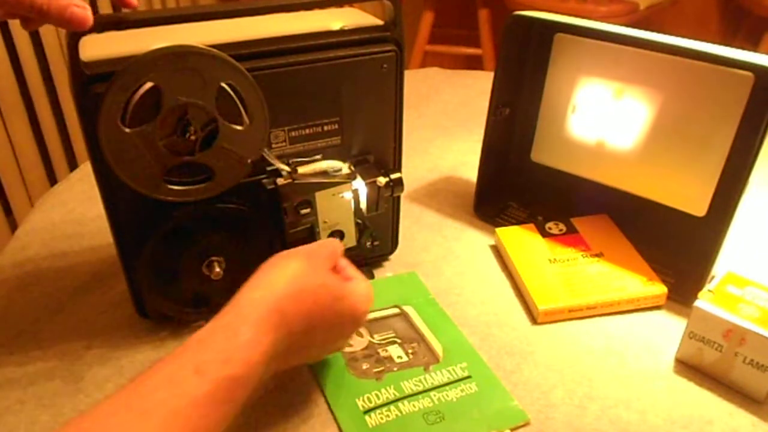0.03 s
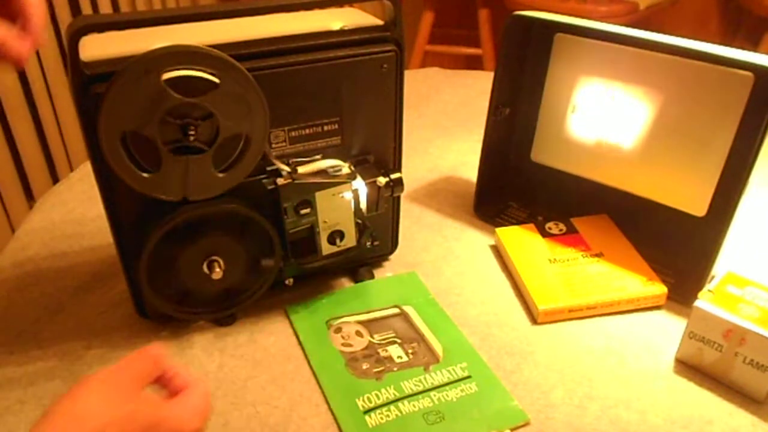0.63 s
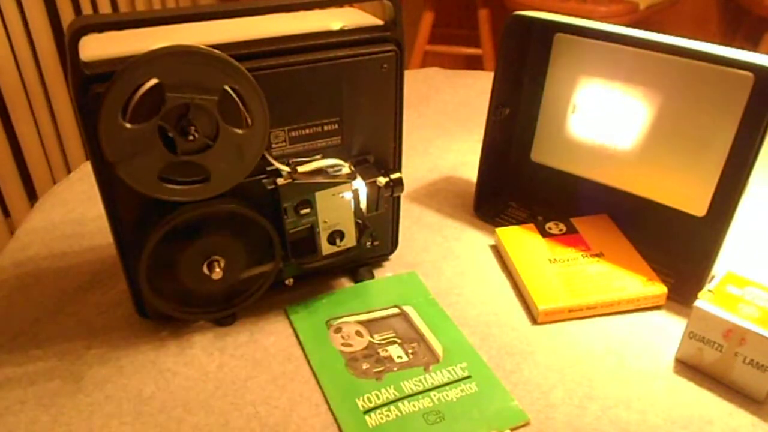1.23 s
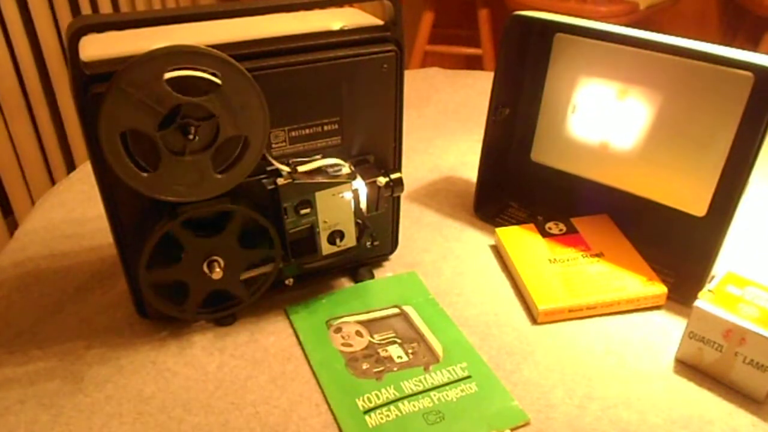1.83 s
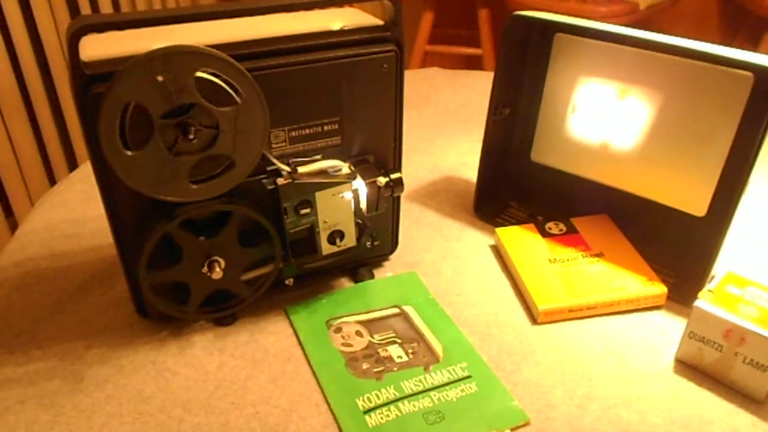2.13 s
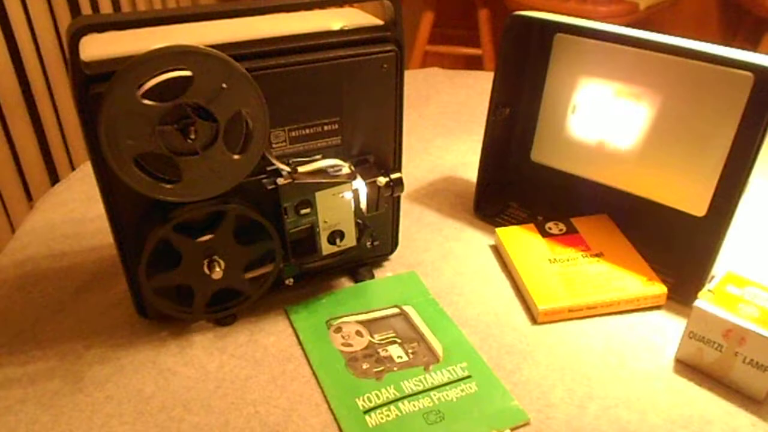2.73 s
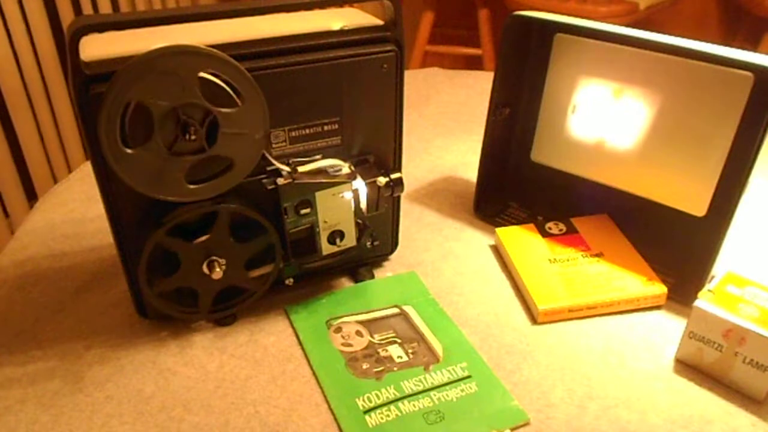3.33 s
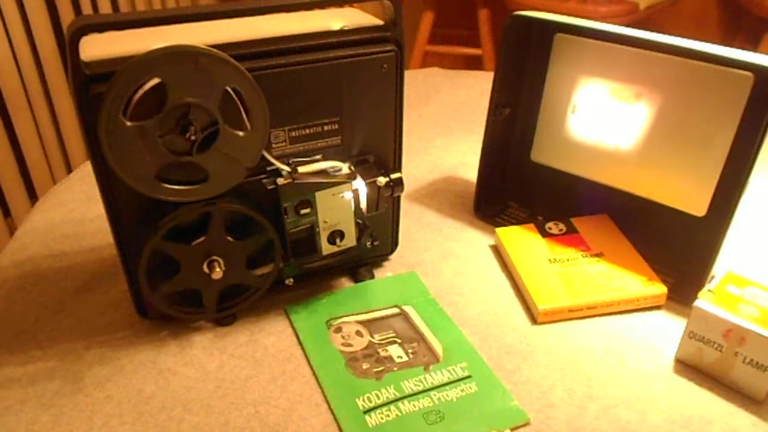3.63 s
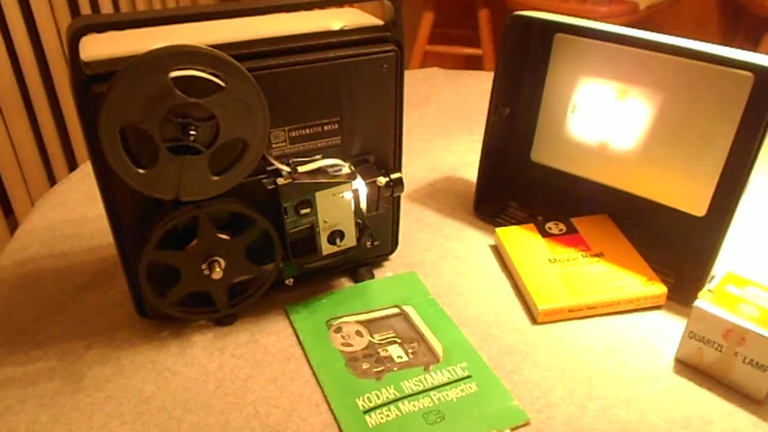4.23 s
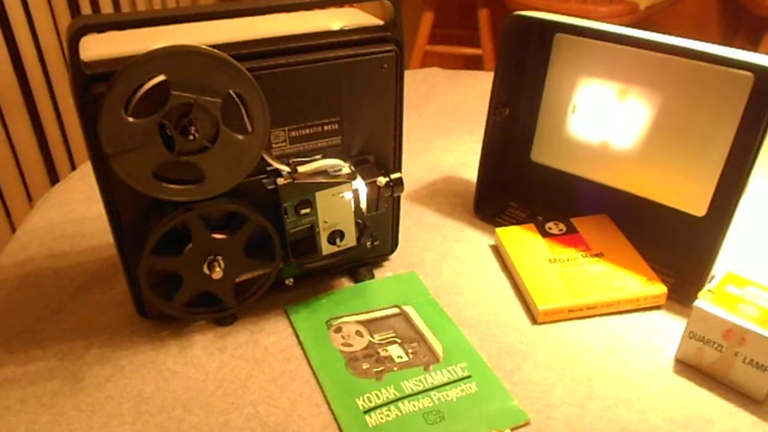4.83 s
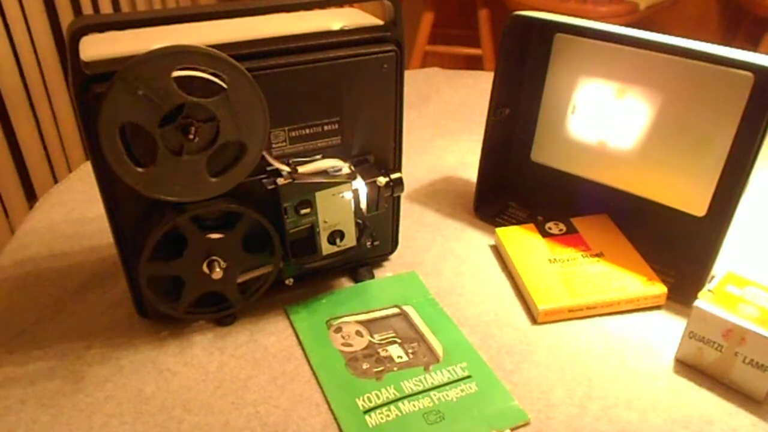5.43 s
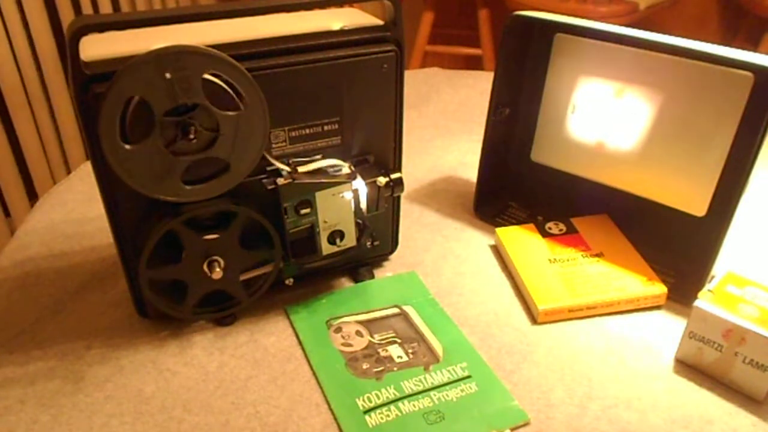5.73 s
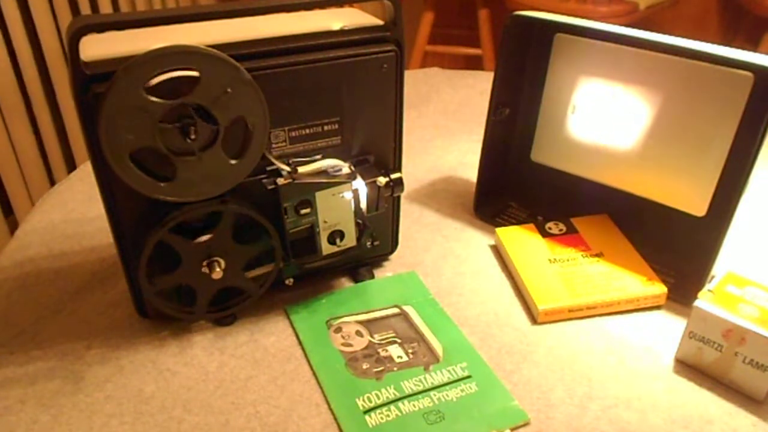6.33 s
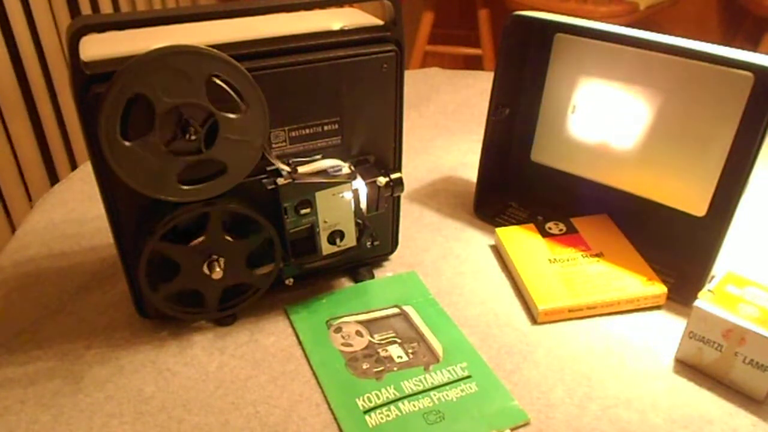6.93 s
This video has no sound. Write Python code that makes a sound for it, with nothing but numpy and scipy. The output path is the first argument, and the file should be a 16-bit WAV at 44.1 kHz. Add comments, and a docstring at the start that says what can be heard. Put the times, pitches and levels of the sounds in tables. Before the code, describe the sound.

A small film projector runs on a table in a living room, heard close up. Its mechanism clatters rapidly and evenly over a humming motor and whirring fan, with a crisp crackle of moving film. Early on, a loose reel rumbles and slack film swishes, rustles and snaps until it pulls tight. The machine then runs on steadily, the whole sound dipping briefly twice along the way.

```python
"""Film projector on a table

A small projector runs in a living room, pulling down nearly nineteen frames a second. At every frame
the claw enters, drags the film through the gate and knocks against its stop; the case rings and the
film crackles. Motor and fan hum and whirr underneath. Early on, the loose reel rumbles and slack film
rustles until it snaps tight. Twice the whole sound dips and swells back."""
import sys
import numpy as np
from scipy import signal
from scipy.fft import rfft, irfft
from scipy.io import wavfile

SR = 44100
rng = np.random.default_rng(int(sys.argv[2]) if len(sys.argv) > 2 else 0)


def wav_out(sig):
    """Save sig, one row per channel (or a flat mono array), as 16-bit PCM at SR to the path in sys.argv[1]."""
    wavfile.write(sys.argv[1], SR, np.round(np.clip(np.atleast_2d(sig).T, -1, 1) * 32767).astype(np.int16))


N = 317520
TIME = np.arange(N) / SR
FRAME_S, FIRST_STOP_S = .0535025, .02975  # the claw meets its stop once a frame
TIGHT_S = 1.8  # the slack film pulls tight


def from_db(db):
    return 10 ** (np.asarray(db) / 20)


def rms_one(x):
    return x / np.sqrt(np.mean(x ** 2) + 1e-20)


def colour(x, spectrum):
    """Minimum-phase EQ that follows a spectrum."""
    hz, db = np.transpose(spectrum)
    size = 4096
    grid = np.maximum(np.fft.rfftfreq(size, 1 / SR), 1)
    gain = from_db(np.interp(np.log(grid), np.log(hz), db))
    cepstrum = irfft(np.log(gain))
    cepstrum[1:size // 2] *= 2
    cepstrum[size // 2 + 1:] = 0
    return signal.fftconvolve(x, irfft(np.exp(rfft(cepstrum))))[:len(x)]


def drift(rate):
    """Random wander at unit rms, with `rate` turning points a second."""
    knots = rng.standard_normal(2000)
    return rms_one(np.interp(TIME * rate, np.arange(len(knots)), knots))


def tones(rows, clock):
    """Sines, each starting at its own point of the cycle."""
    return sum(np.sqrt(2) * from_db(db) * np.sin(2 * np.pi * (hz * clock + rng.random()))
               for hz, db in rows)


def resonate(x, hz, width_hz):
    return signal.lfilter(*signal.iirpeak(hz, hz / width_hz, fs=SR), x)


def clicks(times, db):
    """One impulse at each time."""
    at = np.round(np.ravel(times) * SR).astype(int)
    inside = (at >= 0) & (at < N)
    out = np.zeros(N)
    np.add.at(out, at[inside], from_db(np.ravel(db))[inside])
    return out


def strokes(offsets, contact_db, jitter_s, stroke_db, spread_db):
    """Contacts that repeat at every frame, never quite alike in time or force."""
    stops = np.arange(FIRST_STOP_S, N / SR + FRAME_S, FRAME_S)
    shape = (len(stops), len(offsets))
    times = stops[:, None] + offsets + jitter_s * rng.standard_normal(shape)
    force_db = stroke_db * rng.standard_normal((len(stops), 1)) + spread_db * rng.standard_normal(shape)
    return clicks(times, contact_db + force_db)


def ring(hits, modes):
    """A struck body rings in decaying sines, at unit rms."""
    t = TIME[:SR // 4]
    response = sum((-1) ** k * from_db(db - 60 * t / t60) * np.sin(2 * np.pi * hz * t)
                   for k, (hz, db, t60) in enumerate(modes))
    return rms_one(signal.fftconvolve(hits, response)[:N])


def bursts(hits, t60):
    """Each hit lets off a short puff of noise."""
    energy = signal.lfilter([1], [1, -from_db(-120 / (t60 * SR))], hits ** 2 + 1e-18)
    return np.sqrt(energy) * rng.standard_normal(N)


def crackle(per_s, size_db):
    """Tiny slips of the film, a few much larger than the rest."""
    sizes = from_db(size_db * np.minimum(rng.exponential(1, N), 4.5)) * rng.choice([-1, 1], N)
    return rms_one(sizes * (rng.random(N) < per_s / SR))


def release(since_s, t60):
    """Envelope that holds at one, then dies away once since_s passes zero."""
    return from_db(-60 * np.maximum(since_s, 0) / t60)


# Mains hum of the motor: (frequency [Hz], level [dB])
MAINS_HUM = [(120, -54), (240, -49), (360, -50)]

def motor(rotor_hz=58.89, fan_hz=56.67, opposed_s=.15):
    """Rotor and fan turn at almost the same speed, so they beat slowly under the mains hum."""
    turn = 2 * np.pi * (TIME - opposed_s)
    shafts = from_db(-51.5) * np.sin(rotor_hz * turn) - from_db(-49.5) * np.sin(fan_hz * turn)
    return shafts + tones(MAINS_HUM, TIME) * from_db(1.8 * drift(rate=5.5))


# Tone colour of the fan's whirr: (frequency [Hz], level [dB])
WHIRR_SPECTRUM = [(25, -24.5), (80, -19.5), (130, -12), (220, -5), (330, -0.5), (410, -3.5), (610, -2.5),
                  (800, -9), (1200, -11.5), (1600, -20), (2400, -24), (3200, -27.5), (4500, -35),
                  (12000, -63)]
# Tones of the gear train: (pitch [multiple of the frame rate], level [dB])
GEAR_TONES = [(12, -51.5), (15, -48.5), (17, -47.5), (18, -46.5), (20, -53.5), (29, -54), (34, -58),
              (39, -57), (43, -56.5), (47, -54), (49, -58), (65, -56)]
# Load on the drive, riding whirr and knocks together: (time [s], level [dB])
DRIVE_LOAD = [(0.03, -0.5), (0.35, 1.3), (1.47, -2.5), (1.63, -0.0), (2.6, 0.6), (2.76, -1.5), (3.24, 1.6),
              (3.4, -1.4), (4.04, 1.86), (5.65, -1.0), (5.97, 0.5), (7.2, 0.8)]

def drive(load_db):
    """Fan and gears whirr, with slightly wavering tones at multiples of the frame rate."""
    air = rms_one(colour(rng.standard_normal(N), WHIRR_SPECTRUM)) * from_db(0.72 * drift(rate=28))
    wavering_clock = TIME + 0.00017 * drift(rate=4)
    gears = tones([(order / FRAME_S, db) for order, db in GEAR_TONES], wavering_clock)
    return from_db(load_db - 0.16) * (from_db(-33) * air + from_db(2.5) * gears)


# Resonances of the loose reel: (frequency [Hz], width [Hz], level [dB])
REEL_RESONANCES = [(345.6, 88, 2), (591, 87, -2.5), (747, 26, -5)]

def reel_rumble(fade_db_per_s=2.5):
    """The loosely wound reel rumbles, less and less, until the film pulls tight."""
    shaking = rng.standard_normal(N)
    rumble = sum(from_db(db) * resonate(resonate(shaking, hz, width), hz, width)
                 for hz, width, db in REEL_RESONANCES)
    return from_db(-33 - fade_db_per_s * TIME) * release(TIME - TIGHT_S, t60=0.092) * rms_one(rumble)


# Claw contacts in each frame: (time from the stop [s], case thud [dB], gate knock [dB], film tick [dB])
CLAW_CONTACTS = [(-.0217, 12, -8, 7), (-.0197, 13, -6, 6), (-.0154, 12.5, -3, 6.5), (-.0127, -18, -5, 15),
                 (-.008, -25, -17, 15.5), (-.002, 12.5, 0, 2), (-.0003, 7.5, 6.5, 11),
                 (.004, -14, -1.5, -29)]
# Body of the case: (frequency [Hz], level [dB], decay t60 [s])
CASE_RING = [(570, -19, 0.026), (645, -11.5, 0.15), (739.6, -12, 0.12), (803, 3.5, 0.056),
             (872, -0.5, 0.031), (904, -7, 0.04), (1000, -6.5, 0.02), (1083, 2, 0.03), (1072, 6.5, 0.024),
             (1252, -8, 0.096), (1428, -4.5, 0.0083), (1466, -5.5, 0.057)]
# Ring of the metal gate: (frequency [Hz], level [dB], decay t60 [s])
GATE_RING = [(1120, 2, 0.009), (1213.5, 3.5, 0.051), (1450, -0.5, 0.052), (1650, 7.5, 0.016),
             (1763, 2, 0.017), (1967, 1.5, 0.031), (2035, 0.5, 0.022), (2248, -10, 0.054),
             (2464, -10.5, 0.068), (2780, -4.5, 0.0077), (2820, 4, 0.019), (3123, 2.5, 0.047),
             (3255, 4.5, 0.023), (3240, -28, 0.012), (3760, -45, 0.06)]
# Tone colour of the claw's dry crack: (frequency [Hz], level [dB])
CRACK_SPECTRUM = [(100, -51), (300, -36), (700, -1.5), (1200, -5.5), (1800, -3.5), (2600, -10), (3300, -6),
                  (3900, -17.5), (5000, -20.5), (8000, -20)]

def claw(load_db, belt_hz=7.93, settle_s=0.95, split_hz=2600):
    """Each contact thuds in the case, rings the gate and cracks; the uneven belt adds accents."""
    offsets, thud_db, knock_db, _ = np.transpose(CLAW_CONTACTS)
    belt_pull = np.cos(2 * np.pi * belt_hz * TIME)
    thuds = strokes(offsets, thud_db, jitter_s=.00009, stroke_db=0.2, spread_db=1.7)
    knocks = strokes(offsets, knock_db, jitter_s=.00004, stroke_db=-0.3, spread_db=1.64)
    knocks *= from_db(1.16 * belt_pull)
    case = from_db(-39.5) * ring(thuds, CASE_RING)
    # The stop starts soft, then settles; harder hits shift energy to the gate's upper modes.
    hardness_db = -4.5 * np.exp(-TIME / settle_s) + 1.5 * belt_pull
    lower = ring(knocks * from_db(-.3 * hardness_db), [m for m in GATE_RING if m[0] < split_hz])
    upper = ring(knocks * from_db(hardness_db), [m for m in GATE_RING if m[0] >= split_hz])
    gate = from_db(-46.5) * lower + from_db(-49.5) * upper
    crack = from_db(-44) * rms_one(colour(bursts(knocks, t60=0.019) + 2 * knocks, CRACK_SPECTRUM))
    return from_db(0.38 + 0.62 * load_db) * (case + gate + crack)


# Crisp tone colour of the film: (frequency [Hz], level [dB])
FILM_SPECTRUM = [(1500, -17), (4500, -12.5), (6300, -24), (7500, -10), (8500, -5.5), (9300, -2.5),
                 (10000, 5.5), (10500, 3), (11500, -9), (12300, -25)]
# Friction of the film in the gate: (time [s], level [dB])
GATE_FRICTION = [(0.03, 0.5), (0.56, 1), (0.89, 5.5), (1.42, 0), (1.63, 3), (2.06, 2), (2.17, -0.5),
                 (2.7, 2.7), (3.45, -3), (3.77, 1.1), (4.63, 2.6), (4.84, -1.5), (5.27, 1.5), (5.81, -1),
                 (6.13, 3.5), (6.66, 0.5), (7.2, -2.5)]

def film_in_gate(grip_s=0.0092):
    """The film ticks under the claw and scrapes as it is dragged the last grip_s to the stop."""
    offsets, _, _, tick_db = np.transpose(CLAW_CONTACTS)
    touches = strokes(offsets, tick_db, jitter_s=0.00022, stroke_db=1.5, spread_db=3.5)
    ticks = rms_one(colour(bursts(touches, t60=0.016), FILM_SPECTRUM))
    since_grip = (TIME - FIRST_STOP_S + grip_s) % FRAME_S
    drag = release(since_grip - grip_s, t60=0.03) + from_db(-11)  # a little scrape between pulls
    slips = crackle(per_s=2400, size_db=3.5) * drag * from_db(1.2 * drift(rate=130))
    scrape = rms_one(colour(slips, FILM_SPECTRUM))
    friction_db = np.interp(TIME, *np.transpose(GATE_FRICTION))
    return from_db(friction_db) * (from_db(-42.7) * ticks + from_db(-47) * scrape)


# Sharp snaps of the film: (time [s], level [dB])
SNAP_CUES = [(0.337, -12.5), (0.772, -22), (0.82, -5.5), (0.9397, -19), (1.301, -14.5), (1.598, -11),
             (1.605, -13), (1.6127, -4), (1.889, -16), (2.647, -12), (2.6993, -10.5), (3.0136, -16),
             (6.121, -14.5)]

def film_snaps():
    """The film snaps: a hard click and a tiny puff of noise, all top end."""
    cracks = clicks(*np.transpose(SNAP_CUES))
    snaps = colour(bursts(cracks, t60=.007) + 3 * cracks, FILM_SPECTRUM)
    return signal.sosfilt(signal.butter(2, 6000, "high", fs=SR, output="sos"), snaps)


def slack_film(start_s=0.834, attack_s=0.028, hold_s=0.17, loose_hz=9900, taut_hz=8240):
    """Slack film swishes onto the reel, falls back to a rustle and leaves a faint hiss once tight."""
    attack = np.clip((TIME - start_s) / attack_s, 0, 1)
    swish = from_db(-41.5) * attack * release(TIME - start_s - hold_s, t60=0.31)
    slack = from_db(-46) * attack * release(TIME - TIGHT_S, t60=5.0)
    rubbing = np.maximum(slack, from_db(-54.5) * (TIME > TIGHT_S))
    rustle = rms_one(colour(crackle(per_s=1000, size_db=9.0), FILM_SPECTRUM))
    # The band of hiss slides down as the loop shortens, around 1.11 s.
    loop_left = (1 - np.tanh((TIME - 1.11) / 0.12)) / 2
    hiss_hz = taut_hz + (loose_hz - taut_hz) * loop_left
    flutter = signal.sosfilt(signal.butter(2, 450, fs=SR, output="sos"), crackle(per_s=4500, size_db=6.5))
    hiss = rms_one(flutter * np.sin(2 * np.pi * np.cumsum(hiss_hz) / SR))
    return swish * hiss + rubbing * from_db(-5.5) * (rustle + hiss)


# Dips of the whole mix: (time [s], depth [dB])
DIP_CUES = [(1.597, 6), (4.535, 4.5)]

def dips(attack_s=0.0063, recovery_db_per_s=9):
    """Gain that ducks quickly and swells back at a steady rate."""
    return from_db(sum(np.interp(TIME - s, [0, attack_s, attack_s + db / recovery_db_per_s], [0, -db, 0])
                       for s, db in DIP_CUES))


# Rubs of the film on the reel rim: (time [s], half-length [s], level [dB], frequency [Hz])
RUB_CUES = [(5.266, 0.013, -40, 4400), (5.264, 0.0063, -28.5, 9600), (6.18, 0.079, -57, 4300),
            (6.52, 0.15, -52.5, 3600)]

def rim_rubs():
    """The rim brushes the film: brief swells of narrow-band noise."""
    noise = rng.standard_normal(N)
    rubs = np.zeros(N)
    for s, half_length, db, hz in RUB_CUES:
        swell = np.exp(-((TIME - s) / half_length) ** 2)
        rubs += from_db(db) * swell * rms_one(resonate(noise, hz, width_hz=620))
    return rubs


def room(x, t60, wet_db, delay_s):
    """Table and walls add a short diffuse tail."""
    t = TIME[:SR // 2]
    tail = rng.standard_normal(len(t)) * from_db(-60 * t / t60)
    response = np.concatenate([np.zeros(int(delay_s * SR)), tail / np.linalg.norm(tail)])
    return x + from_db(wet_db) * signal.fftconvolve(x, response)[:N]


def scene():
    """The machine close up, in mono, with a little room on the claw and the film."""
    load_db = np.interp(TIME, *np.transpose(DRIVE_LOAD))
    clatter = room(claw(load_db), t60=0.22, wet_db=-13.5, delay_s=.004)
    film = room(film_in_gate() + film_snaps() + slack_film(), t60=0.24, wet_db=-14, delay_s=.0026)
    mix = clatter + film + drive(load_db) + motor() + reel_rumble() + rim_rubs()
    return (dips() * mix)[None]


def record(dry):
    """Two notches in the treble and a steep cut at the top."""
    for hz, width_hz in ((5512, 1300), (11025, 450)):
        dry = signal.lfilter(*signal.iirnotch(hz, hz / width_hz, fs=SR), dry)
    return signal.sosfilt(signal.cheby2(16, 60, 12950, fs=SR, output="sos"), dry)


dry = scene()
out = record(dry)
wav_out(out)
```